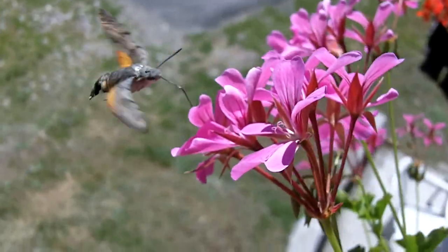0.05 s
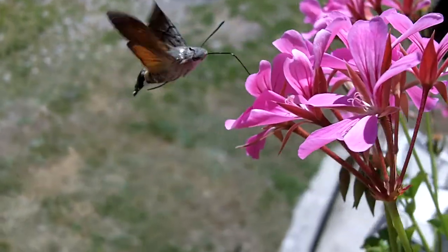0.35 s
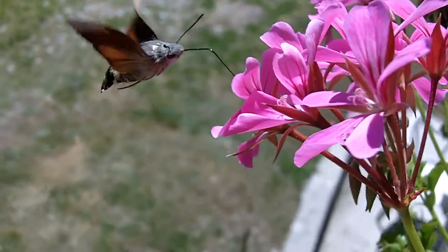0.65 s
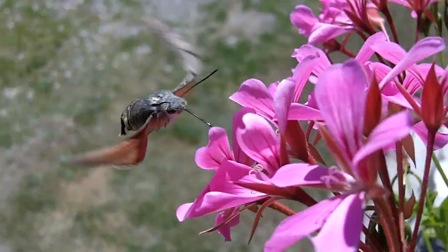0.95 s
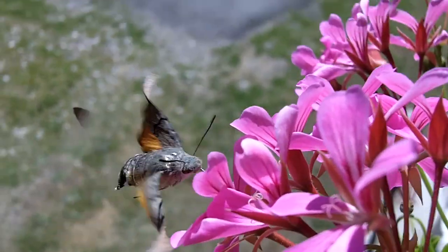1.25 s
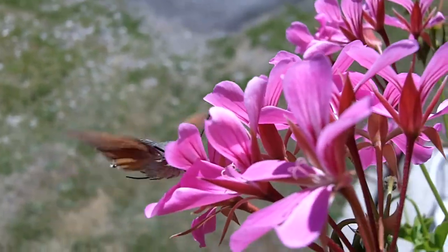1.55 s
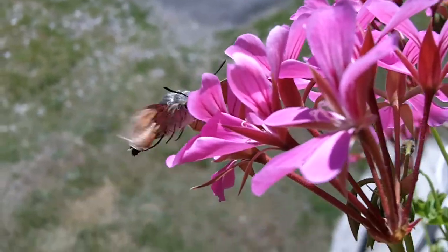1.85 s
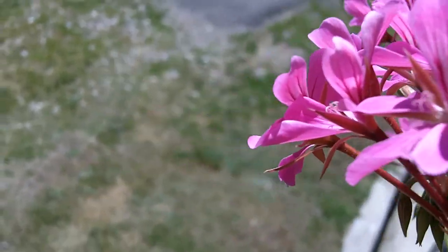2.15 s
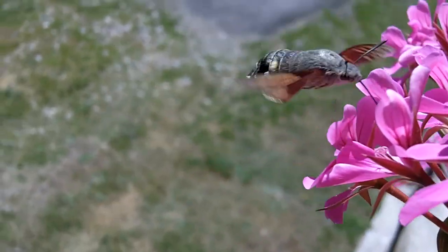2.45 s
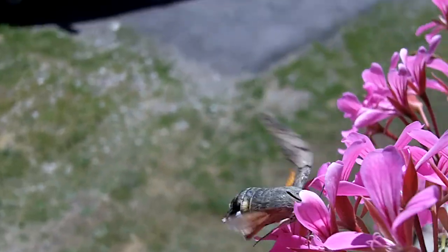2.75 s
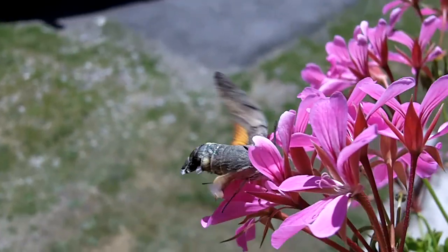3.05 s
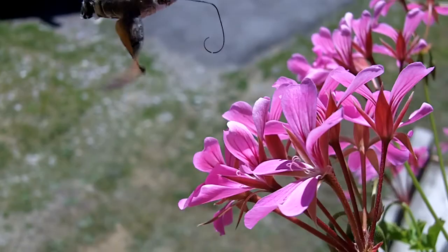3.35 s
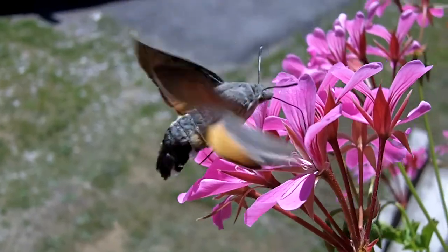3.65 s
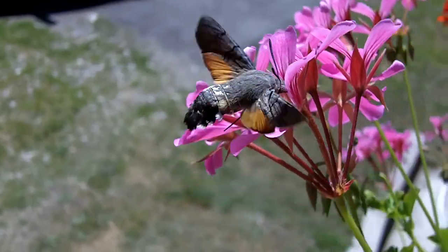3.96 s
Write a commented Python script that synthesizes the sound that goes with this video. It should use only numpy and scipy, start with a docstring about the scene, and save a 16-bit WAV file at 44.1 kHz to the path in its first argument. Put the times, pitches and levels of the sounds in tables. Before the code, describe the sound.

A moth hovers at flowers close to the microphone outdoors, its wings making a low, throbbing hum with faint swishes and dry ticks. A smaller insect drones past twice, a breeze bumps the microphone, and the hum grows louder near the end.

```python
"""A hummingbird hawk-moth hovers at geranium flowers, a hand's width from a camera outdoors.
Its wings push the air in a low throbbing hum and swish at every stroke.
Now and then they tick, from a single hard stroke or a light brush on a petal.
A smaller insect drones past twice; a breeze bumps the microphone over a soft background hiss."""
import sys
import numpy as np
from scipy.fft import rfft, irfft, dct
from scipy.io import wavfile

SR = 44100
rng = np.random.default_rng(int(sys.argv[2]) if len(sys.argv) > 2 else 0)


def bounce(signal):
    """Save signal as a 16-bit WAV file at the path given by the first command-line argument."""
    frames = np.transpose(np.atleast_2d(signal))
    limited = np.clip(frames, -1, 1)
    pcm = np.round(limited * 32767).astype(np.int16)
    wavfile.write(sys.argv[1], SR, pcm)


N = 176400
TIME = np.arange(N) / SR
HZ = np.fft.rfftfreq(N, 1 / SR)
OPPOSED = np.array([[1], [-1]])  # added on the left, taken away on the right
MAIN_STROKE = 0.871  # how far through each wingbeat the main stroke comes


def gain(db):
    """Turns decibels into a multiplier."""
    return 10 ** (np.asarray(db) / 20)


def unit(x):
    """Scales a signal to an average strength (rms) of 1."""
    return x / np.sqrt(np.mean(x ** 2) + 1e-20)


def curve(rows, column=1):
    """Joins the points of a time table with straight lines."""
    rows = np.array(rows)
    return np.interp(TIME, rows[:, 0], rows[:, column])


def noise(colour):
    """Noise of strength 1; the colour table sets the balance of lows and highs."""
    hz, db = np.transpose(colour)
    shape = gain(np.interp(np.log(HZ + 1), np.log(hz + 1), db))
    return unit(irfft(rfft(rng.standard_normal(N)) * shape, N))


def wander(rate_hz=22):
    """A smooth random wobble of strength 1."""
    return unit(irfft(rfft(rng.standard_normal(N)) * np.exp(-(HZ / rate_hz) ** 2), N))


def swell(at_s, half_s):
    """A smooth rise and fall around one moment."""
    return np.exp(-((TIME - at_s) / half_s) ** 2)


# Hiss shared by left and right (frequency [Hz], relative level [dB])
HISS_COLOUR = [(100,10.5),(250,7.5),(1000,-4),(2000,-12),(4500,-19),(7000,-18),(12600,-24),(13300,-38)]
# Hiss that differs between them (frequency [Hz], relative level [dB])
SIDE_COLOUR = [(400,-7.5),(1000,-18),(4000,-35),(12000,-25.5),(15000,-49)]

def background_hiss():
    """Steady background hiss, its top treble cut off near 13 kHz."""
    return gain(-58) * noise(HISS_COLOUR) + gain(-74) * OPPOSED * noise(SIDE_COLOUR)


# The deep tone of the wind (frequency [Hz], relative level [dB])
WIND_COLOUR = [(20,17.5),(42,2),(70,-1.5),(130,-24),(3000,-94)]
# Bumps of air (time [s], level at the bump's peak [dB], half length [s])
GUSTS = [(.12,-37,0.044),(.5,-37.5,0.037),(0.919,-35.5,0.053),(1.07,-38.5,0.1),(1.41,-35.5,0.046),(2.87,-28.5,0.081),(3.08,-33.5,0.036),(3.55,-32.5,0.033),(3.915,-32,.025)]

def breeze(rumble_db=-45.5, side_db=-21):
    """Moving air presses on the microphone: a light rumble and short bumps."""
    rumble = gain(rumble_db) * noise(WIND_COLOUR)
    for at_s, db, half_s in GUSTS:
        gust = swell(at_s, half_s)
        rumble += gain(db) * gust.std() * unit(gust * noise(WIND_COLOUR))
    return rumble + gain(rumble_db + side_db) * OPPOSED * noise(WIND_COLOUR)


# One list per fly-by (time [s], pitch [Hz], level [dB], octave compared with the note [dB])
FLY_BYS = [
    [(.92,249.8,-62,-26),(.97,250.1,-46,-21),(1.02,247.5,-59,-15.5),(1.44,246.2,-55.5,-8.5)],
    [(2.7,271.2,-54.5,-20),(2.88,266.3,-64.5,2.5),(2.95,253.7,-50,-14),(3,231.7,-67,-18)],
]

def small_insect(path, fade_s=0.012, waver_db=2):
    """A soft note and its octave swell and fade as the insect darts about."""
    angle = 2 * np.pi * np.cumsum(curve(path)) / SR
    inside_s = np.minimum(TIME - path[0][0], path[-1][0] - TIME)
    fade = np.clip(inside_s / fade_s + .5, 0, 1)
    level = fade * gain(curve(path, column=2) + waver_db * wander(rate_hz=10.4))
    octave = gain(curve(path, column=3)) * np.sin(2 * angle)
    return np.sqrt(2) * level * (np.sin(angle) + octave)


# Wing ticks (time [s], level [dB])
TICKS = [(.074,-58),(.660,-51),(1.262,-49),(1.51,-52.5),(1.522,-54),(1.980,-52),(3.016,-55),(3.102,-49),(3.111,-50)]
# Their bright tone (frequency [Hz], relative level [dB])
TICK_COLOUR = [(400,-36),(1200,-9),(8000,-9),(15000,-35)]

def wing_ticks(rise_s=0.0002, decay_s=0.0022):
    """Sharp dry wing ticks: single hard strokes or light brushes."""
    level = sum(gain(db) * np.exp(-np.maximum((TIME - at_s) / decay_s, (at_s - TIME) / rise_s))
                for at_s, db in TICKS)
    return level * noise(TICK_COLOUR)


def puffs(beats, colour, width, uneven_db, at=MAIN_STROKE):
    """One puff of air per wingbeat, each of random strength; width and at are fractions of a beat."""
    place = beats - at + .5
    strength = gain(uneven_db * rng.uniform(-1, 1, N))[np.floor(place).astype(int)]
    pulse = np.exp(-abs(place % 1 - .5) / width)
    return unit(strength * pulse) * noise(colour)


# Rush of the main stroke (time [s], level [dB])
MAIN_SWISH = [(0,-71.5),(.58,-66),(.66,-65.5),(.78,-66),(.94,-63.5),(1.01,-70),(1.27,-60),(1.37,-69.5),(1.51,-64.5),(1.92,-74),(2.1,-63),(2.25,-72),(2.66,-64.5),(3.22,-69.5),(3.37,-56.5),(3.49,-72),(3.61,-68.5)]
# Rush of the return stroke (time [s], level [dB])
RETURN_SWISH = [(0,-87),(1.15,-70.5),(1.98,-65),(2.2,-72.5),(4,-73)]
# The tone of both (frequency [Hz], relative level [dB])
SWISH_COLOUR = [(250,-22),(600,-0.5),(1000,3.5),(4000,-5.5),(7000,-3.5),(10000,-20),(15000,-30)]

def wing_swish(beats):
    """Air rushes over the wings twice a beat, out and back."""
    main = gain(curve(MAIN_SWISH)) * puffs(beats, SWISH_COLOUR, width=.054, uneven_db=3)
    back = gain(curve(RETURN_SWISH)) * puffs(beats, SWISH_COLOUR, width=.11, uneven_db=4, at=.27)
    return main + back


# Churned air (time [s], level [dB])
WASH_LEVEL = [(0,-63),(.78,-60),(.92,-48),(1.02,-58),(1.09,-47.5),(1.15,-52.5),(1.3,-49.5),(1.62,-55.5),(2.25,-59.5),(2.53,-51),(3.15,-66.5),(3.8,-47)]
# Its dull tone (frequency [Hz], relative level [dB])
WASH_COLOUR = [(130,3.5),(280,-6),(420,-16),(750,-14),(2000,-50)]

def wing_wash(beats):
    """Swirling air under the wings reaches the microphone in ragged puffs."""
    return gain(curve(WASH_LEVEL)) * puffs(beats, WASH_COLOUR, width=.4, uneven_db=3.5)


# Close swerves (time [s], level [dB])
SWERVES = [(2.07,-59),(3.354,-58.5)]
# Their papery tone (frequency [Hz], relative level [dB])
WHIRR_COLOUR = [(300,4),(1900,-4.5),(7000,-21),(15000,-38)]

def swerve_whirr(beats):
    """The wings whirr briefly as the moth swerves close by."""
    level = sum(gain(db) * swell(at_s, half_s=.065) for at_s, db in SWERVES)
    return level * puffs(beats, WHIRR_COLOUR, width=.18, uneven_db=1.5)


# Hum as the moth turns and nears (time [s], lowest note [dB], octave above [dB])
HUM_LEVELS = [(0,-62,-54.5),(.22,-54.5,-57.5),(.26,-47,-49.5),(.6,-61,-54.5),(.69,-46.5,-49.5),(.92,-45.5,-46.5),(1.02,-53,-53),(1.09,-45.5,-44.5),(1.22,-51.5,-43),(1.55,-46.5,-43.5),(1.92,-48.5,-46.5),(2.02,-50.5,-51),(2.17,-50,-45.5),(2.28,-54,-57.5),(2.5,-44.5,-45.5),(2.75,-43.5,-45),(3.15,-47.5,-50.5),(3.62,-43,-45),(3.73,-34.5,-41.5),(4,-36.5,-41.5)]
# Buzz of harmonics 4 to 8 (time [s], base level [dB])
BUZZ_LEVEL = [(0,-66),(.7,-63),(1.25,-56),(1.45,-59),(1.95,-57),(2.06,-52),(2.22,-65),(2.5,-59),(2.8,-63),(3.2,-65),(3.37,-56),(3.65,-60)]

def wing_hum(beats, beat_hz, waver_db=1.87, third_db=-13.5, step_db=-5.5, rough_rad=.3):
    """Each beat pushes air into a hum; the flip of the wings adds a rough buzz."""
    bright_db = np.minimum(.6 * (beat_hz - beat_hz.mean()), 3.5)  # a quicker beat is brighter
    lowest, octave = curve(HUM_LEVELS), curve(HUM_LEVELS, column=2)
    third = (lowest + octave + bright_db) / 2 + third_db
    waver = waver_db * wander()
    # Harmonic k is a pure tone at k times the wingbeat rate.
    hum = sum(gain(db + waver) * np.cos(2 * np.pi * k * beats)
              for k, db in enumerate([lowest, octave, third], 1))
    buzz = 0
    for step, k in enumerate(range(4, 9)):
        db = step_db * step + (bright_db if step else -bright_db / 2)
        buzz += gain(db) * np.cos(2 * np.pi * k * (beats - MAIN_STROKE) + rough_rad * wander())
    return np.sqrt(2) * (hum + gain(curve(BUZZ_LEVEL)) * buzz)


# How fast the wings beat (time [s], rate [Hz])
WINGBEAT = [(0,70.47),(.22,65.43),(.27,74.15),(.54,64.44),(.68,69.09),(1.02,66.1),(1.14,73.75),(1.22,69.34),(1.42,73.78),(1.51,80.7),(1.75,78.2),(1.83,84.4),(1.93,78.4),(2.01,89.65),(2.13,70.4),(2.27,65.37),(2.6,74.4),(2.64,86.9),(3.05,74.97),(3.2,75.16),(3.26,85.2),(3.33,88.1),(3.46,67.4),(3.84,73.18),(3.89,66.5),(3.95,88.2),(4,81.6)]

def hawk_moth(jitter=.008):
    """One slightly unsteady wingbeat drives the swish, wash, whirr and hum."""
    beat_hz = curve(WINGBEAT)
    beats = np.cumsum(beat_hz * (1 + jitter * wander())) / SR  # wingbeats so far
    return wing_swish(beats) + wing_wash(beats) + swerve_whirr(beats) + wing_hum(beats, beat_hz)


def scene():
    """The insects are close and central, with breeze and hiss around them."""
    insects = hawk_moth() + wing_ticks() + sum(small_insect(path) for path in FLY_BYS)
    return insects + breeze() + background_hiss()


def record(dry, dip_hz=5400, width_hz=750, depth=.92, top_hz=15100):
    """The microphone's opening weakens one band of treble; the very highest sounds are cut off."""
    hz = np.arange(N) * SR / (2 * N)
    dip = 1 - depth * np.exp(-abs((hz - dip_hz) / width_hz) ** 1.45)
    cutoff = np.clip((top_hz - hz) / 200 + .5, 0, 1)
    spectrum = dct(dry, norm="ortho")
    return dct(spectrum * dip * cutoff, type=3, norm="ortho")


dry = scene()
out = record(dry)
bounce(out)
```